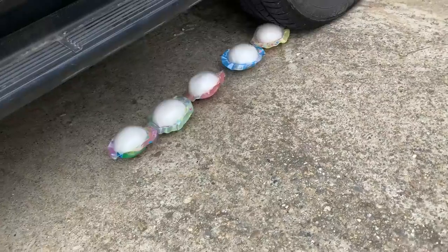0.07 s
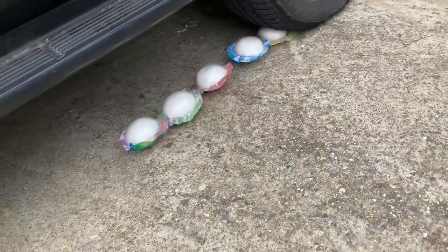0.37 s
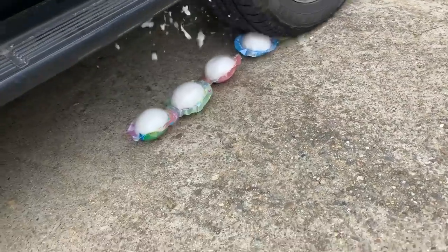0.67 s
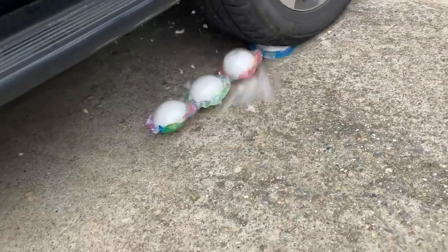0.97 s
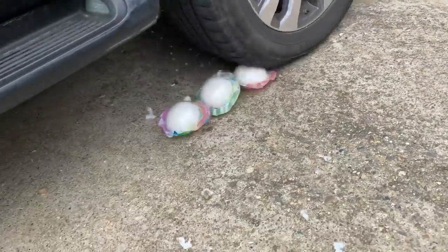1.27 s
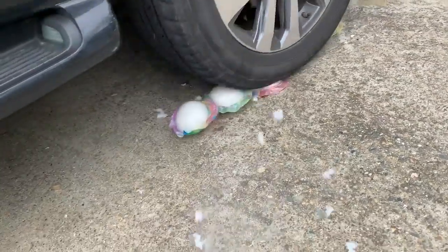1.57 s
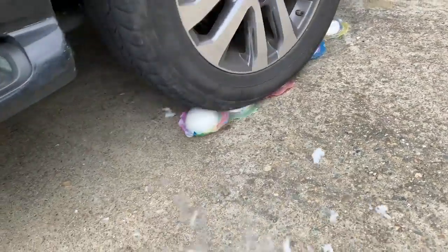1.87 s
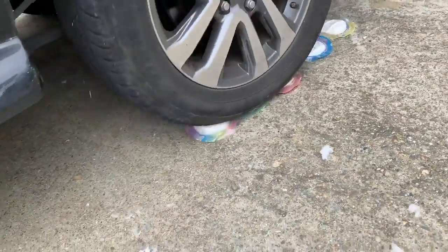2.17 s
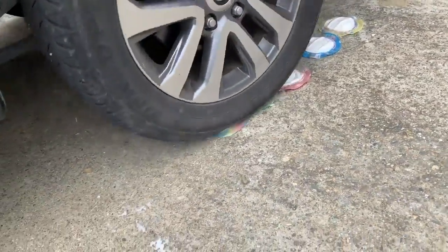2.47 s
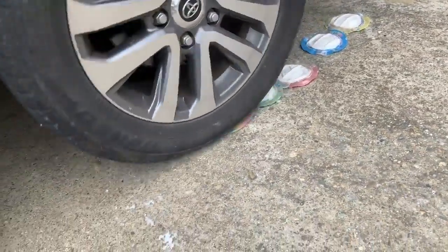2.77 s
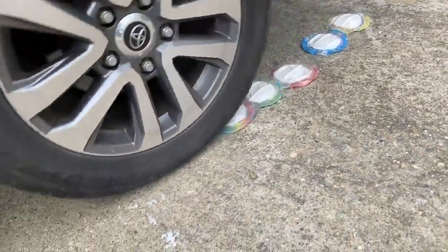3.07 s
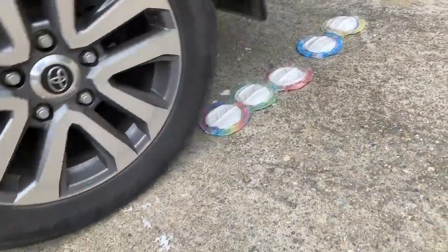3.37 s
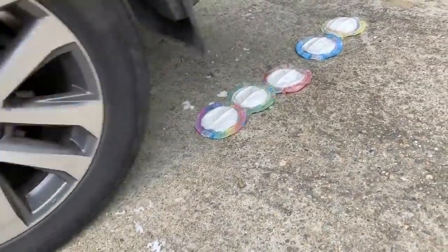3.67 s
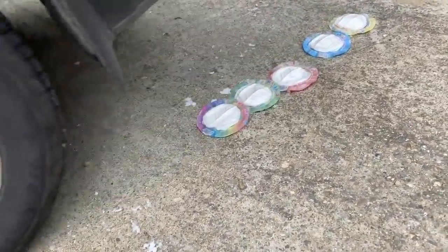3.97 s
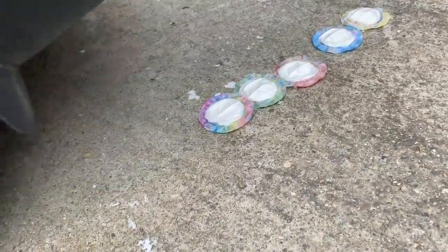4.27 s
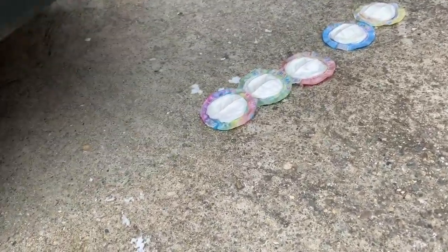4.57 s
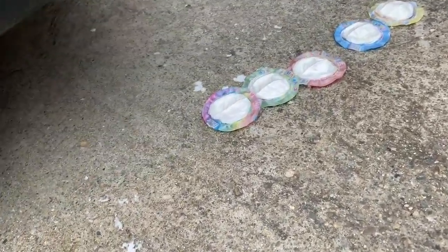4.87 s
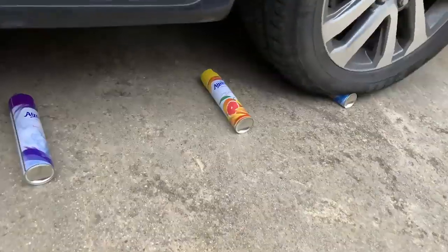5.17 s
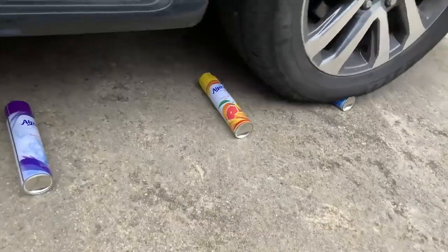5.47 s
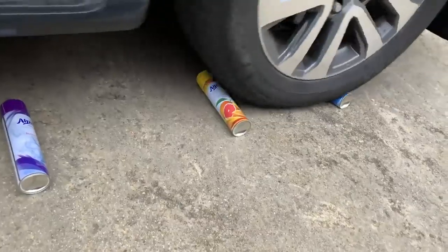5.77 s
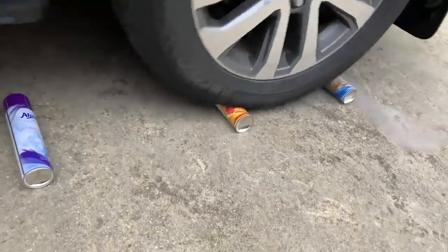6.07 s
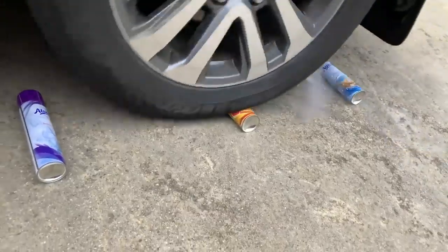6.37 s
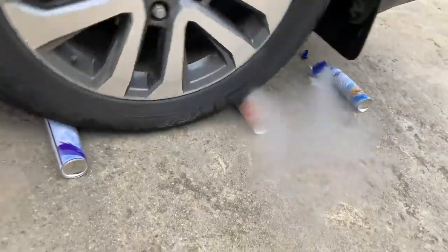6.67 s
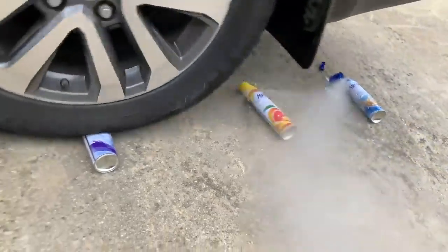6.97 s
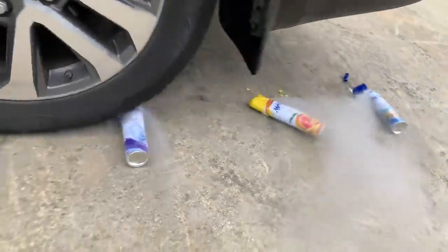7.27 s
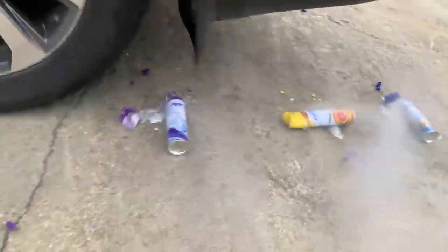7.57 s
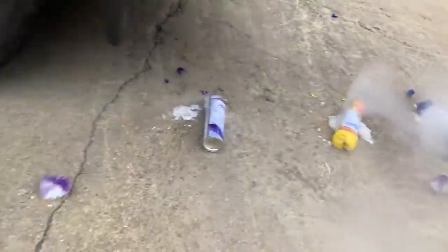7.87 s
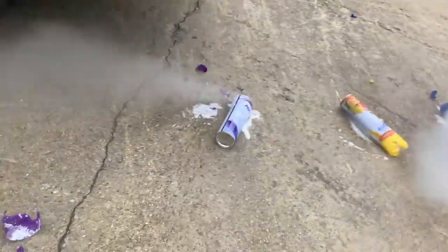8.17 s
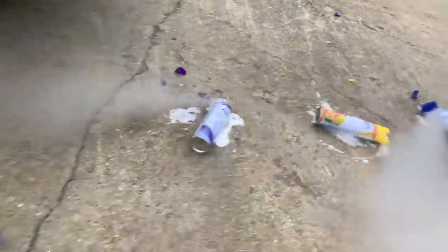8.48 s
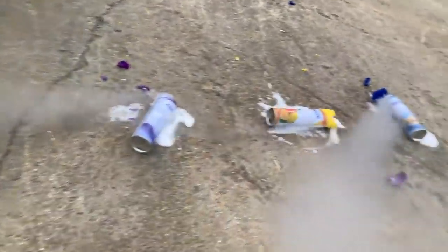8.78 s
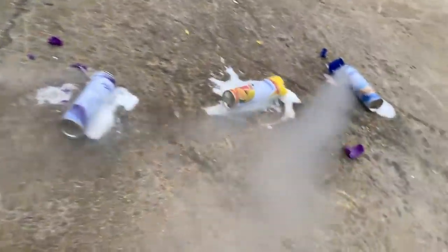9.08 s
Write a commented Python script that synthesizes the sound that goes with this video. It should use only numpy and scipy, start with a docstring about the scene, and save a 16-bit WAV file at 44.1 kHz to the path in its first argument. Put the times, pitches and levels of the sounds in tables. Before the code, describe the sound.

A car tyre bursts five puffed foil pouches with loud bangs, then crunches three aerosol cans that hiss, over a faint idling engine.

```python
"""A car tyre bursts five puffed-up foil pouches, each bang a pressure pulse that overloads the microphone.
In a second run it rolls onto three aerosol cans: rubber creaks, caps crack, steel walls buckle, and
the propellant hisses out in wandering jets that splash off the concrete. Foil and grit tick under the
tread. Behind it all the engine idles as the car creeps by, with two dabs of throttle to climb a can."""
import sys
import numpy as np
from scipy import signal
from scipy.fft import rfft, irfft, next_fast_len
from scipy.io import wavfile

SR = 44100
rng = np.random.default_rng(int(sys.argv[2]) if len(sys.argv) > 2 else 0)


def master_out(mix):
    """Clip the mix to full scale and print it as 16-bit PCM to the path in sys.argv[1]."""
    frames = np.transpose(np.atleast_2d(mix))
    ceiling = np.clip(frames, -1, 1)
    pcm = np.round(ceiling * 32767).astype(np.int16)
    wavfile.write(sys.argv[1], SR, pcm)


N = 411894
TIME = np.arange(N) / SR
AGE = np.arange(SR // 2) / SR   # seconds since a hit
START_S, CAN_RUN_S = .105, 5.07   # the sound begins; the pouch run gives way to the can run


def from_db(db):
    return 10 ** (np.asarray(db) / 20)


def rms_one(x):
    return x / np.sqrt(np.mean(x ** 2) + 1e-20)


def curve(points):
    """A (time_s, value) curve at every sample."""
    return np.interp(TIME, *np.transpose(points))


def add(out, start_s, sound):
    at = int(start_s * SR)
    out[at:at + len(sound)] += sound[:N - at]


def noise(colour, size=N):
    """Noise at rms 1, shaped by (freq_hz, level_db) points and rolled off beyond them."""
    hz, db = np.transpose(colour)
    padded = next_fast_len(size, real=True)
    freqs = np.maximum(np.fft.rfftfreq(padded, 1 / SR), 1)
    gain = from_db(np.interp(np.log(freqs), np.log(hz), db))
    roll_off = np.minimum(freqs / hz[0], 1) * np.minimum(hz[-1] / freqs, 1) ** 2
    return rms_one(irfft(rfft(rng.standard_normal(padded)) * gain * roll_off, padded)[:size])


def drift(per_s):
    """A random wander at rms 1 with about per_s turns a second."""
    return rms_one(np.interp(TIME * per_s, np.arange(4000), rng.standard_normal(4000)))


def resonate(x, hz, width_hz):
    """One resonance with a peak gain of 1."""
    r = np.exp(-np.pi * width_hz / SR)
    feedback = [1, -2 * r * np.cos(2 * np.pi * hz / SR), r * r]
    return signal.lfilter(np.array([1, 0, -1]) * (1 - r * r) / 2, feedback, x)


def noise_band(hz, width_hz):
    return rms_one(resonate(rng.standard_normal(N), hz, width_hz))


def clicks(per_s, spread_db):
    """Random clicks of uneven size."""
    size = from_db(spread_db * np.minimum(rng.exponential(1, N), 4))
    return size * rng.choice([-1, 1], N) * (rng.random(N) < per_s / SR)


def fade(t60):
    return np.exp(-np.log(1000) * AGE / t60)


def ring(hz, t60):
    return np.sin(2 * np.pi * hz * AGE) * fade(t60)


def burst(colour, t60, tail_db, tail_t60):
    """A noise hit of set energy: a fast decay, then a tail of echoes from car and ground."""
    shape = fade(t60) + from_db(tail_db) * fade(tail_t60)
    return rms_one(noise(colour, size=len(AGE)) * shape) * np.sqrt(np.mean(shape ** 2))


def envelope(start_s, rise_s, hold_s, release_s):
    """Linear attack, hold, exponential release."""
    age = TIME - start_s
    return np.clip(age / rise_s, 0, 1) * np.exp(-np.maximum(age - rise_s - hold_s, 0) / release_s)


def swells(rows):
    """One gain curve from rows of envelope times and level_db."""
    return sum(from_db(db) * envelope(*shape) for *shape, db in rows)


def passing(passes):
    """Pass-by gains, one row per run: they fall as one over distance, 3 dB down at span_s."""
    pouch_run, can_run = (from_db(db)[:, None] / np.hypot(1, (TIME - nearest_s) / span_s)
                          for nearest_s, span_s, *db in passes)
    return np.where(TIME < CAN_RUN_S, pouch_run, can_run)


# tailpipe pass-bys: nearest_s, span_s, harmonic_1_db, harmonic_2_db, harmonic_3_db, lope_db
TAILPIPE_PASSES = [(4.7, 1.5, -55, -56, -59, -54), (8.05, 0.9, -46.5, -59, -56, -59.5)]
# lope of uneven firing: multiple of the engine cycle, level_db
LOPE_PARTIALS = [(2, 4.5), (6, -10.5), (13, -16.5), (14, -16.5), (20, -24), (22, -21), (26, -14.5),
                 (27, -19)]
# dabs of throttle to climb the first can: start_s, rise_s, hold_s, release_s, boost_db
THROTTLE_DABS = [(5.27, .1, .06, 0.075, 6), (5.68, .08, 0.1, 0.038, 5.5)]
def exhaust(firing, cycle):
    """A three-harmonic firing hum, boosted by throttle, and a lope; both swell as the tailpipe nears."""
    idle_db, idle_lope_db = -61, -58.5   # come through the body wherever the tailpipe is
    *harmonics, lope_gain = passing(TAILPIPE_PASSES)
    harmonics[0] = np.hypot(harmonics[0], from_db(idle_db))
    puffs = -sum(gain * from_db(.8 * drift(9.8)) * np.cos(k * firing)
                 for k, gain in enumerate(harmonics, 1))
    hum = puffs * (1 + .15 * np.cos(firing / 2))   # every other firing is stronger
    lope = sum(from_db(db) * np.sin(k * cycle) for k, db in LOPE_PARTIALS)
    lope *= np.hypot(lope_gain, from_db(idle_lope_db))
    throttle_db = sum(db * envelope(*shape) for *shape, db in THROTTLE_DABS)
    return np.sqrt(2) * (from_db(throttle_db) * hum + lope)


# engine bay pass-bys: nearest_s, span_s, level_db
BAY_PASS_BYS = [(1.75, 1.38, -47.5), (5.9, 2.44, -49)]
# broad machinery whirr: freq_hz, level_db
WHIRR_COLOUR = [(35, -27), (60, -10), (144, -15.5), (190, -12.5), (289, -14), (539, -13), (633, -9),
                (1080, -16), (1750, -16.5), (2110, -24), (3050, -19.5), (3660, -38), (4950, -30),
                (5820, -43.5), (15000, -59.5)]
# engine bay resonances: pitch_hz, width_hz, level_db
BAY_MODES = [(300, 90, -19), (704, 93, -11), (1740, 100, -12.5), (3100, 560, -14.5)]
def engine_bay(firing, cycle):
    """A resonant whirr that throbs with the firings, and swells and knocks once per cycle."""
    modes = sum(from_db(db) * noise_band(hz, width_hz) for hz, width_hz, db in BAY_MODES)
    knock = from_db(-7 + 9 * (np.cos(cycle - 1.7) - 1)) * noise_band(298, width_hz=25)
    whirr = from_db(-1) * noise(WHIRR_COLOUR)
    throb_db = 1.7 * np.cos(cycle) + .9 * np.sin(firing) + .8 * np.sin(2 * firing)
    return passing(BAY_PASS_BYS)[0] * from_db(throb_db) * (whirr + modes + knock)


def squeak(cycle):
    """One chirp per engine cycle, left behind as the car moves on."""
    level_db, fade_db_per_s = -57, 2
    tone = .6 * rms_one(resonate(noise_band(4980, width_hz=400), 4980, width_hz=400))
    tone += from_db(-4) * noise_band(3030, width_hz=60)
    tone += from_db(-1) * noise_band(1790, width_hz=140)
    pulsing_db = 15 * (np.cos(cycle) - 1) + 2.5 * drift(45) + 2.5 * drift(6)
    return from_db(level_db - fade_db_per_s * TIME + pulsing_db) * tone


# engine speed: time_s, firing_hz
ENGINE_SPEED = [(0, 46.7), (5.05, 46.7), (5.25, 41.5), (5.45, 46), (5.62, 48), (5.75, 61), (5.92, 60),
                (6.12, 45.5), (7, 46.2), (7.95, 47), (8.25, 43.3), (9.34, 44)]
def engine():
    """The idling bed: bay, squeak and exhaust, locked to the firing phase of the cylinders."""
    cylinders, cycle_start_s = 8, .088
    firing = 2 * np.pi * np.cumsum(curve(ENGINE_SPEED)) / SR
    cycle = (firing - np.interp(cycle_start_s, TIME, firing)) / cylinders
    return engine_bay(firing, cycle) + squeak(cycle) + exhaust(firing, cycle)


def squeeze(grip_s=.28, let_go_s=.55):
    """How hard the tyre works the foil: it builds towards each bang and dies away after it."""
    grips = [np.exp(np.minimum((TIME - s) / grip_s, (s - TIME) / let_go_s)) for s, *_ in POUCH_BANGS]
    return np.linalg.norm(grips, axis=0)


# foil and grit under the tread: start_s, level_db, pitch_hz, relative_thud_db
TREAD_TICKS = [(0.208, -38, 4960, -25), (.399, -38, 7600, -27), (.461, -44, 7540, -25),
               (.563, -39, 6000, -21), (.592, -42, 8300, -30), (0.836, -28.5, 3330, -32),
               (.903, -37, 4500, -25), (1.030, -37.5, 12900, -32), (1.399, -29, 4530, -12),
               (1.419, -29, 4370, -2), (1.472, -35.5, 8640, 9.5), (1.762, -22.5, 4250, -25),
               (1.894, -31, 3400, -25.5), (2.046, -29, 3600, -14), (2.327, -29.5, 3600, -33.5),
               (2.715, -33, 3500, -24), (3.745, -39, 3100, -24)]
def tread_ticks():
    """Tiny pitched snaps of foil and grit, over the fine crinkle of squeezed pouches."""
    out = np.zeros(N)
    for start_s, db, hz, thud_db in TREAD_TICKS:
        snap = from_db(-24.5) * burst(SNAP_COLOUR, t60=.0081, tail_db=-9, tail_t60=.04)
        ping = from_db(2) * ring(hz, t60=.0018)
        thud = from_db(thud_db - 5.5) * burst(HOLLOW_COLOUR, t60=.04, tail_db=-22.5, tail_t60=.1)
        add(out, start_s, from_db(db) * (snap + ping + thud))
    crinkle = sum(resonate(clicks(per_s=20, spread_db=3.5), hz, width_hz=1500)
                  for hz in np.geomspace(3500, 13000, 6))
    return out + from_db(-70) * squeeze() * rms_one(crinkle)


# rubber creaking on the first can: start_s, rise_s, hold_s, release_s, level_db
CREAK_SWELLS = [(5.07, .02, 0.11, .02, -52), (5.36, .09, 0.23, 0.35, -50.5)]
# resonances of the rubbed can: pitch_hz, width_hz, level_db
CAN_MODES = [(1275, 100, 2), (1500, 110, 1), (1800, 110, -4), (2740, 130, -5.5), (4150, 300, -32.5)]
def rubber_creak():
    """Rubber slips in tiny jerks over steel and sets the can ringing."""
    slips = clicks(per_s=1800, spread_db=1.5)
    body = sum(from_db(db) * rms_one(resonate(slips, hz, width_hz)) for hz, width_hz, db in CAN_MODES)
    return swells(CREAK_SWELLS) * rms_one(body)


def turbulence(jet, depth_db, per_s, bands):
    """Narrow bands of a jet swell and sink independently; its overall level is kept."""
    padded = next_fast_len(N, real=True)
    spectrum = rfft(jet, padded)
    band = (np.sqrt(np.linspace(0, 1, len(spectrum))) * bands).astype(int)
    out = sum(irfft(spectrum * (band == k), padded)[:N] * from_db(depth_db * drift(per_s))
              for k in range(bands))
    return rms_one(out) * np.std(jet)


# leaks before a valve breaks: start_s, rise_s, hold_s, release_s, level_db
PINHOLE_LEAKS = [(5.08, .1, 0.054, .02, -56.5), (5.31, .13, .29, .015, -51.5), (5.98, .45, 0.24, .25, -54)]
# thin, bright fizz: freq_hz, level_db
FIZZ_COLOUR = [(2000, -22), (4500, 2.5), (6000, -0.5), (8200, 0), (10500, -6.5), (12000, -5.5), (16000, -6)]
def pinhole_fizz():
    """Gas fizzes through pinholes in the cans, and faintly from the squeezed pouches."""
    gain = swells(PINHOLE_LEAKS) + from_db(-65) * squeeze()
    return gain * from_db(1.2 * drift(150)) * noise(FIZZ_COLOUR)


# a jet sweeps over the concrete: start_s, rise_s, hold_s, release_s, level_db
SPLASH_SWEEPS = [(6.68, .07, .15, .25, -53.5), (7.32, .07, .03, 0.07, -38), (8.1, .06, 0.062, .1, -51.5),
                 (8.64, .06, .05, .05, -48.5), (8.93, .08, .14, .06, -46)]
# midrange splash of gas: freq_hz, level_db
SPLASH_COLOUR = [(120, -6.5), (300, -7), (550, 4), (750, 6.5), (900, -10.5), (1050, 1.5), (1500, -5),
                 (2200, -11), (4000, -28)]
# the splash rises as the cans roll round: time_s, pitch_ratio
SPLASH_BEND = [(0, 1), (7.6, 1), (8.3, 1.45), (9.34, 1.5)]
def concrete_splash(rush_gain):
    """Gas strikes the concrete: a steady share of the rush, plus passing sweeps."""
    position = np.cumsum(curve(SPLASH_BEND))
    rising = np.interp(position, np.arange(2 * N), noise(SPLASH_COLOUR, size=2 * N))
    return np.hypot(swells(SPLASH_SWEEPS), from_db(-13.5) * rush_gain) * rising


# one jet per broken valve: start_s, rise_s, rush_db, hiss_db, slope_db_per_s
VALVE_JETS = [(6.05, 0.17, -51.5, -53, 1.5), (6.68, 0.069, -38.5, -46, -5.5), (7.309, 0.052, -42, -39, -8)]
# the third can gushes as its valve gives way, then spurts: start_s, rise_s, hold_s, release_s, level_db
VALVE_GUSHES = [(7.04, .13, 0.034, 0.0066, -31.5), (7.55, .04, .07, .05, -45.5), (7.83, .04, .08, .05, -46),
                (9.09, .05, .02, .035, -46)]
# broad rush, rough gush and airy nozzle hiss: freq_hz, level_db
RUSH_COLOUR = [(300, -13), (900, -8), (1500, -1), (2200, -3), (3300, -4.5), (4400, -4.5), (6000, -10.5),
               (8000, -11), (12000, -23)]
GUSH_COLOUR = [(200, -18.5), (450, -7.5), (750, 3), (1300, -1.5), (2700, -2), (3150, -4.5), (3700, -5.5),
               (4600, -1.5), (6300, -6), (7500, -14.5), (11000, -22), (14000, -13.5), (16000, -19.5)]
HISS_COLOUR = [(2500, -21), (6000, -4.5), (8000, -3.5), (11000, 2.5), (13500, 3.5), (16000, -0.5)]
def propellant_jets():
    """Gas leaks, then hisses from the broken valves, rushes outward and strikes the concrete."""
    jets = [from_db([[rush_db], [hiss_db]]) * np.clip((TIME - s) / rise_s, 0, 1)
            * from_db(slope * (TIME - s)) for s, rise_s, rush_db, hiss_db, slope in VALVE_JETS]
    rush_gain, hiss_gain = np.linalg.norm(jets, axis=0)
    sputter = drift(45)
    fizz = pinhole_fizz()
    splash = from_db(1.8 * sputter) * concrete_splash(rush_gain)
    thrown_up = from_db(-2.5) * swells(SPLASH_SWEEPS)   # each sweep adds to the rush
    rush = np.hypot(rush_gain, thrown_up) * from_db(.88 * sputter) * noise(RUSH_COLOUR)
    gush = swells(VALVE_GUSHES) * from_db(3.4 * drift(180)) * noise(GUSH_COLOUR)
    hiss = hiss_gain * from_db(.5 * drift(60)) * noise(HISS_COLOUR)
    return turbulence(fizz + splash + rush + gush + hiss, depth_db=1.3, per_s=16, bands=44)


# the tyre drops as a can flattens: start_s, level_db
TYRE_DROPS = [(5.436, -24.5), (6.036, -24), (6.249, -24), (6.279, -29.5), (6.688, -31.5), (6.784, -22.5),
              (6.893, -28.5), (7.013, -30)]
# dull rubber body: freq_hz, level_db
RUBBER_COLOUR = [(70, -60), (150, -13), (230, -9.5), (380, 2), (520, -5), (900, -13)]
def tyre_thumps():
    """The quickly damped thud of the tyre carcass."""
    out = np.zeros(N)
    for start_s, db in TYRE_DROPS:
        add(out, start_s, from_db(db) * burst(RUBBER_COLOUR, t60=.046, tail_db=-26, tail_t60=.42))
    return out


# cans buckling and caps cracking: start_s, wall_pitch_hz, wall_db, knock_db, snap_db, relative_tail_db
CAN_CRACKS = [(5.184, 1510, -27.5, -47, -38, -27), (5.305, 1810, -29.5, -48, -43, -18),
              (5.435, 2140, -20, -17.5, -21.5, -10), (5.563, 1440, -34.5, -31.5, -65, -10),
              (5.583, 3680, -23.5, -34, -28, -15), (5.588, 1200, -23, -35, -40, -3),
              (5.639, 2680, -33, -35.5, -35, -10), (5.714, 1020, -23, -20.5, -36, -5),
              (6.035, 4100, -10.5, -15.5, -17.5, -11), (6.065, 4560, -12, -32.5, -19.5, -20),
              (6.078, 1660, -23.5, -37, -30.5, -6), (6.139, 4050, -29, -32, -43, -31),
              (6.147, 4300, -34, -39, -38.5, -7), (6.214, 2710, -36.5, -36, -32, -24),
              (6.238, 3900, -37, -43, -41, -12), (6.2486, 1150, -28, -18.5, -25.5, -14.5),
              (6.278, 2520, -26.5, -22.5, -35, -8), (6.349, 2300, -36, -34, -41, -7.5),
              (6.391, 1500, -38.5, -31, -59, 2.5), (6.687, 1350, -42, -34.5, -46, -4.5),
              (6.783, 4280, -11.5, -27, -18, -9), (6.803, 3150, -46, -32, -31, -8),
              (6.819, 1670, -17.5, -28, -26.5, -6), (6.857, 1710, -26, -39, -35, -8.5),
              (6.893, 1790, -30, -36.5, -32.5, -1), (6.919, 3550, -35, -37, -33, -12),
              (6.992, 2560, -24, -31, -24, -16), (7.013, 1200, -27, -19.5, -36, -23)]
# the hollow between tyre and ground, crumpling steel and a crisp snap: freq_hz, level_db
HOLLOW_COLOUR = [(80, -75.5), (220, -14.5), (450, -9), (660, 10.5), (850, 5.5), (1200, -6.5), (2000, -4)]
STEEL_COLOUR = [(600, 0), (1200, 4), (1700, 5), (2400, -3.5), (3200, 4.5), (4400, 0.5), (6000, -9),
                (9000, -37)]
SNAP_COLOUR = [(2500, -27.5), (5000, -2), (6500, -1), (9000, -5.5), (13000, -4), (16000, -13.5)]
def can_cracks():
    """A wall gives way: a sharp snap, a ring choked by rubber, a knock from the hollow under the tyre."""
    out = np.zeros(N)
    hollows_hz = 681 * np.exp(.03 * rng.standard_normal(len(CAN_CRACKS)))
    for (start_s, wall_hz, wall_db, knock_db, snap_db, tail_db), hollow_hz in zip(CAN_CRACKS, hollows_hz):
        knock = burst(HOLLOW_COLOUR, t60=.021, tail_db=tail_db, tail_t60=.1)
        knock += from_db(6) * ring(hollow_hz, t60=.019)
        wall = burst(STEEL_COLOUR, t60=.0095, tail_db=tail_db + .5, tail_t60=.1)
        wall += from_db(4) * ring(wall_hz, t60=.016)
        snap = from_db(4.5) * burst(SNAP_COLOUR, t60=.0073, tail_db=tail_db, tail_t60=.064)
        snap += from_db(2) * ring(hz=4000, t60=.003)   # the instant of fracture
        crack = from_db(knock_db) * knock + from_db(wall_db) * wall + from_db(snap_db) * snap
        add(out, start_s + .0006, crack)
    return out


def air_gust(push_s=.0031, sway_hz=15.3, damping=.26):
    """A puff of air shoves the microphone, whose bass roll-off swings slowly back."""
    push = -AGE / push_s * np.exp(1 - AGE / push_s)
    omega = 2 * np.pi * sway_hz
    return signal.lfilter(*signal.bilinear([1, 0, 0], [1, 2 * damping * omega, omega ** 2], SR), push)


# bursting pouches: start_s, blast_db, pulse_ms, rip_db, echo_db, gust_db, wrapper_pitch_hz, wrapper_db
POUCH_BANGS = [(0.628, 4.5, 1.32, -7, -10.5, -22, 1930, -11), (1.0784, 9.5, 1.474, -12, -11, -16, 3377, -6),
               (1.6283, 10.5, 1.48, -10.5, -16, 1, 4380, -14),
               (1.9399, 6.5, 1.193, -1.5, -16, -44, 3850, -18.5),
               (2.3741, 10, 0.87, -4.5, -16.5, 1, 2420, 3)]
# body of the bang: freq_hz, level_db
BANG_COLOUR = [(60, -15.5), (150, 0.5), (240, -2), (330, 4.5), (400, -4.5), (800, 1.5), (1050, -9),
               (1350, -1), (1900, -14), (2500, -14.5), (3500, -12), (6000, -21.5), (10000, -26.5),
               (16000, -36)]
# ringing under the car: pitch_hz, level_db, t60_s
UNDERBODY_MODES = [(340, -5.5, 0.16), (484, -7, 0.17), (703, -11, 0.19), (926, -5.5, 0.037),
                   (1248, -6, 0.16), (1431, -14.5, 0.074), (2420, -15, 0.093)]
def pouch_bangs():
    """A pressure pulse, ripping foil, scatter between tyre and ground, ringing under the car, a gust."""
    out = np.zeros(N)
    for start_s, blast_db, pulse_ms, rip_db, echo_db, gust_db, wrapper_hz, wrapper_db in POUCH_BANGS:
        progress = AGE * 1000 / pulse_ms
        pulse = -from_db(8) * np.sin(2 * np.pi * progress) * (progress < 1)
        scatter = from_db(-5.5) * burst(BANG_COLOUR, t60=.029, tail_db=-25, tail_t60=.1)
        rip = from_db(rip_db + 2) * burst(SNAP_COLOUR, t60=.024, tail_db=-30.5, tail_t60=.052)
        wrapper = from_db(wrapper_db) * ring(wrapper_hz, t60=.026)
        attack = from_db(blast_db) * (pulse + scatter) + rip + wrapper
        echoes = burst(BANG_COLOUR, t60=.11, tail_db=-38, tail_t60=.4)
        modes = sum(from_db(db - 7) * (-1) ** k * ring(hz, t60)
                    for k, (hz, db, t60) in enumerate(UNDERBODY_MODES))
        hollow = from_db(-2.5) * burst(HOLLOW_COLOUR, t60=.12, tail_db=-39.5, tail_t60=.3)
        build_up = 1 - np.exp(-AGE / .0054)
        tail = from_db(echo_db) * build_up * (echoes + modes + hollow)
        add(out, start_s, attack + tail + from_db(gust_db) * air_gust())
    return out


def scene():
    """Everything at one microphone close to the wheel."""
    low_cut = signal.butter(2, 168, "high", fs=SR, output="sos")   # cracks and thumps are kept clear of deep bass
    crushing = signal.sosfilt(low_cut, can_cracks() + tyre_thumps() + 1e-18)
    mix = pouch_bangs() + tread_ticks() + crushing + rubber_creak() + engine() + propellant_jets()
    return (mix * (TIME > START_S))[None, :]


def record(dry):
    """The bangs flatten against full scale, and a steep low-pass trims the top."""
    cutoff_hz = 15750
    clipped = .97 * dry / (1 + dry ** 8) ** (1 / 8)
    return signal.sosfilt(signal.ellip(10, .1, 70, cutoff_hz, fs=SR, output="sos"), clipped)


dry = scene()
out = record(dry)
master_out(out)
```